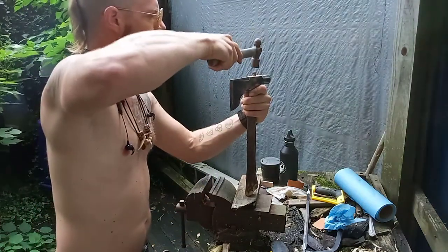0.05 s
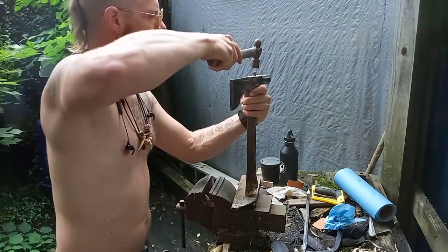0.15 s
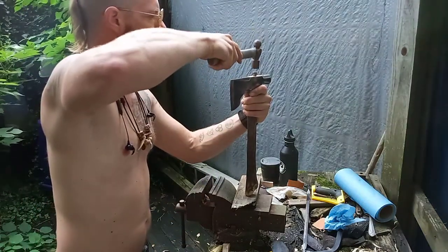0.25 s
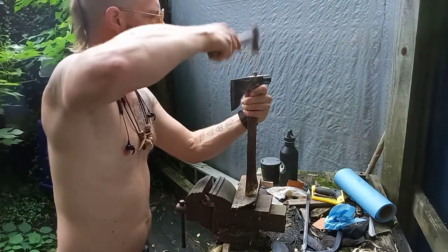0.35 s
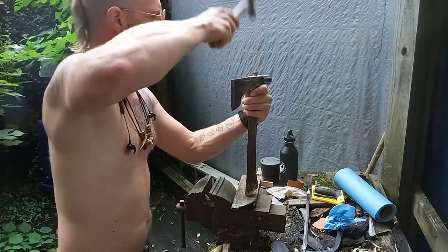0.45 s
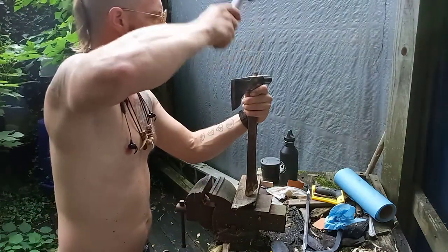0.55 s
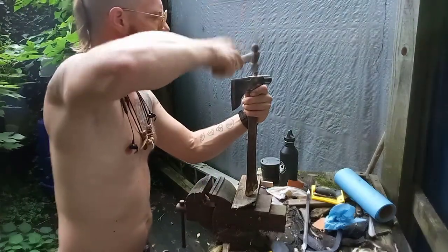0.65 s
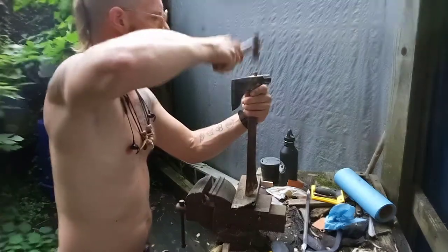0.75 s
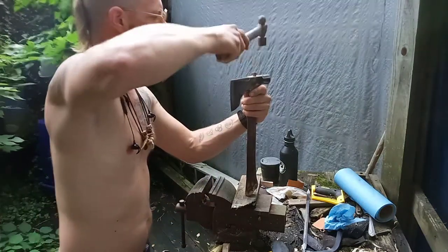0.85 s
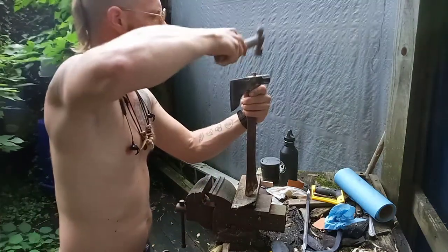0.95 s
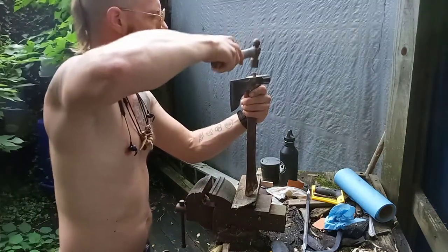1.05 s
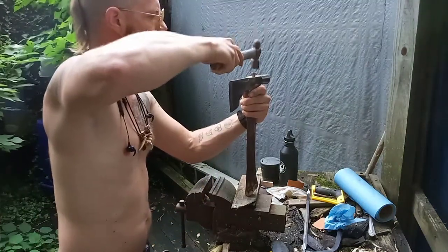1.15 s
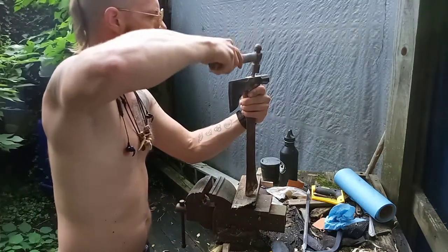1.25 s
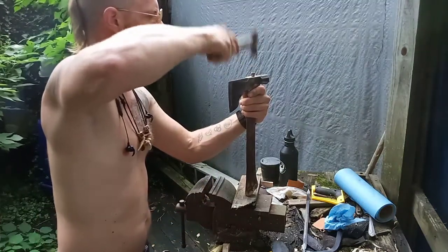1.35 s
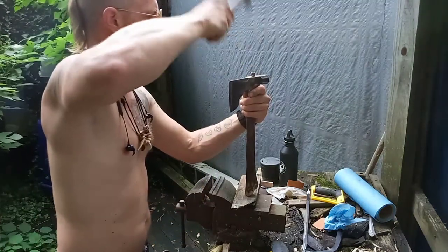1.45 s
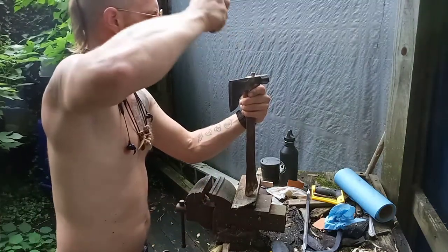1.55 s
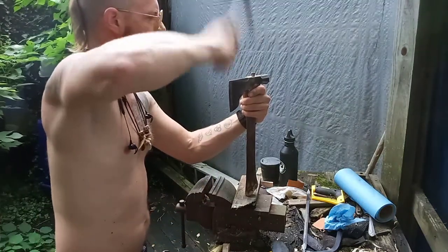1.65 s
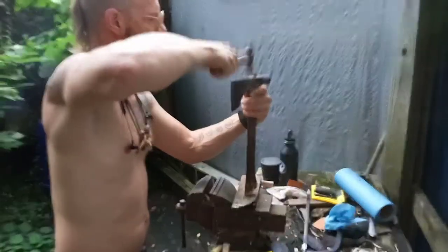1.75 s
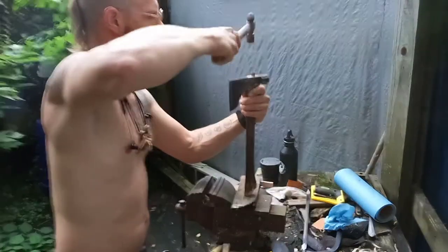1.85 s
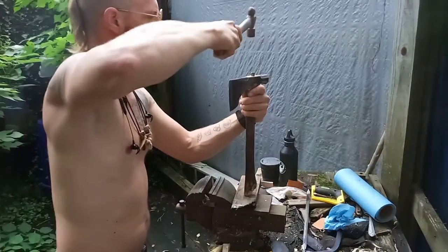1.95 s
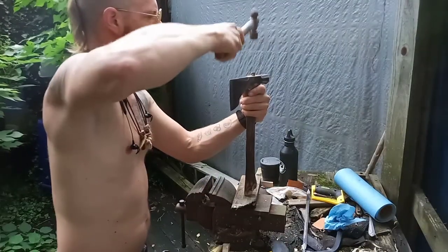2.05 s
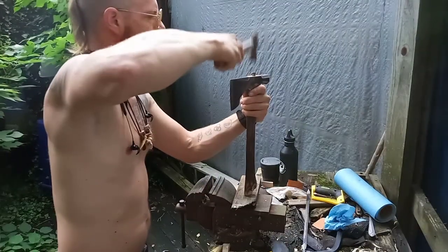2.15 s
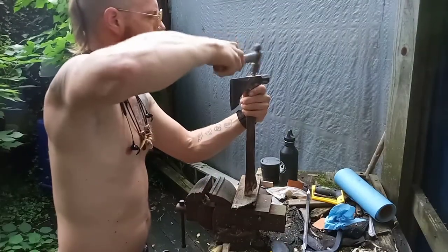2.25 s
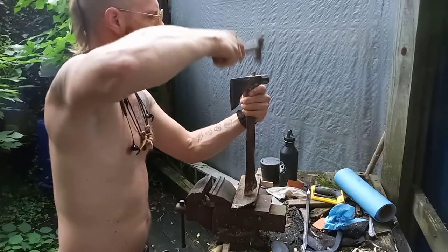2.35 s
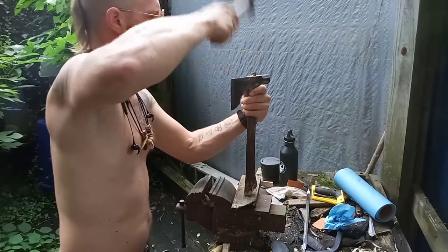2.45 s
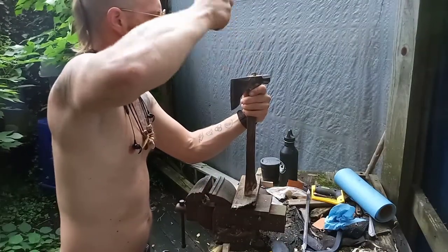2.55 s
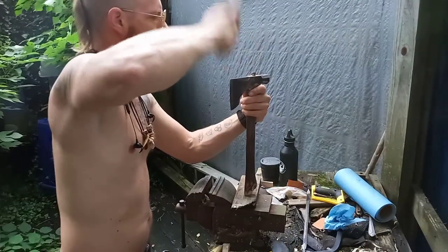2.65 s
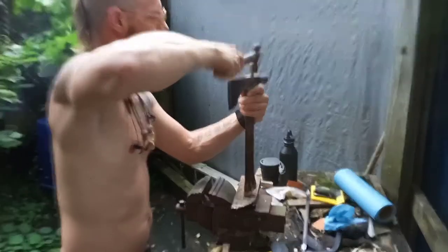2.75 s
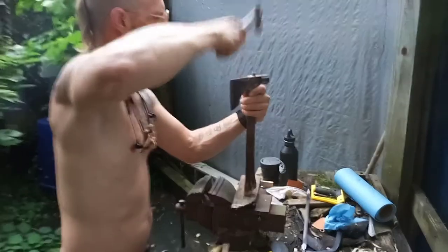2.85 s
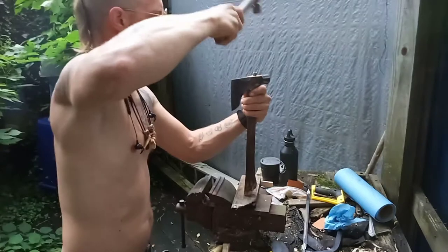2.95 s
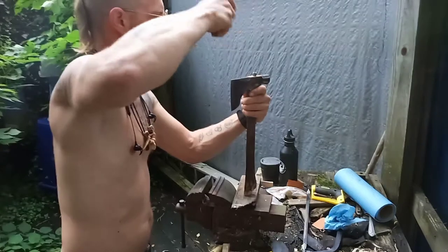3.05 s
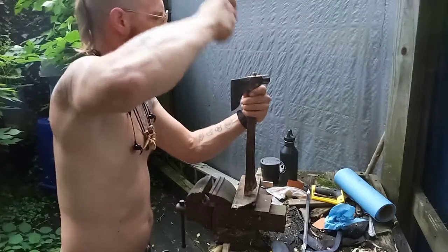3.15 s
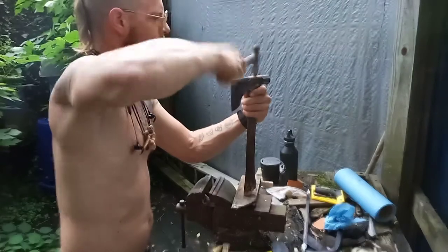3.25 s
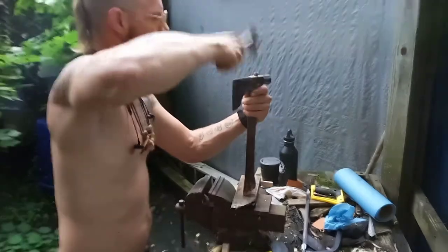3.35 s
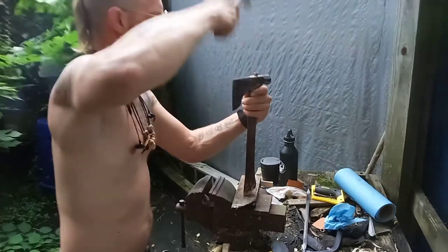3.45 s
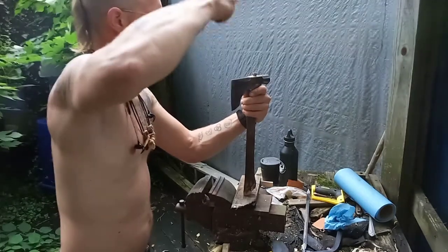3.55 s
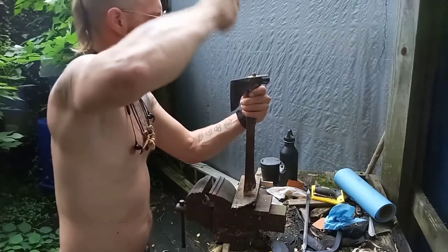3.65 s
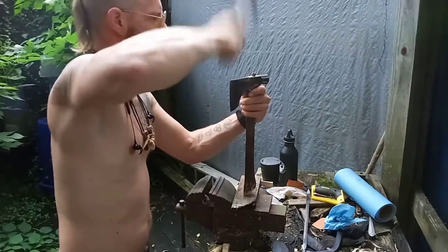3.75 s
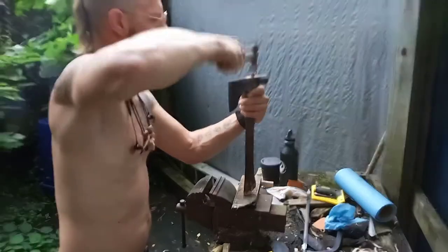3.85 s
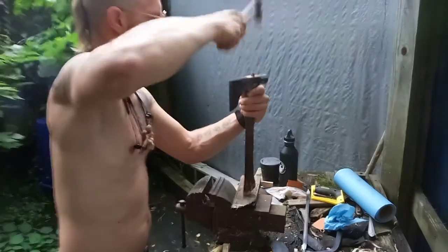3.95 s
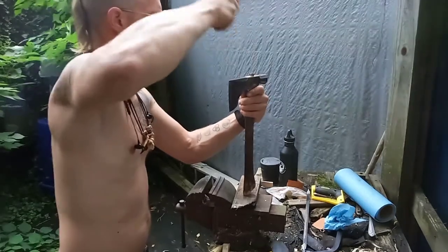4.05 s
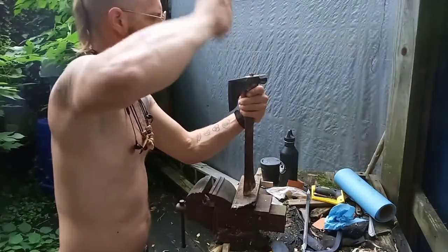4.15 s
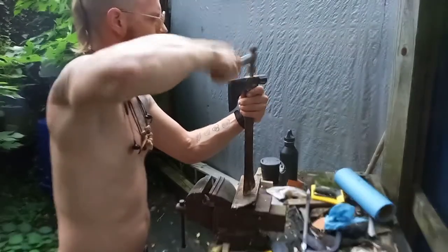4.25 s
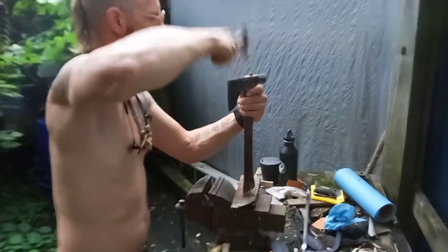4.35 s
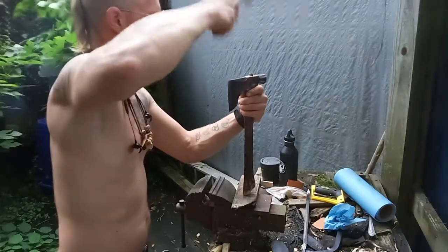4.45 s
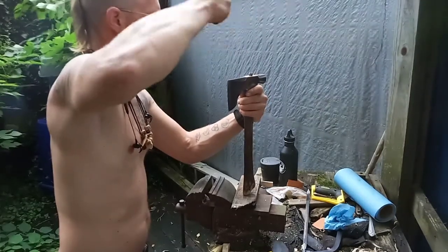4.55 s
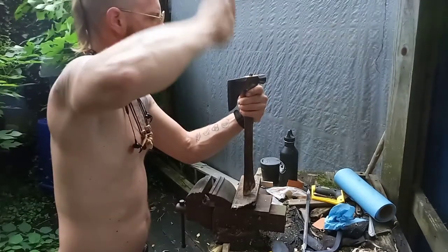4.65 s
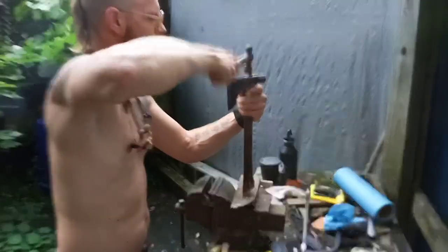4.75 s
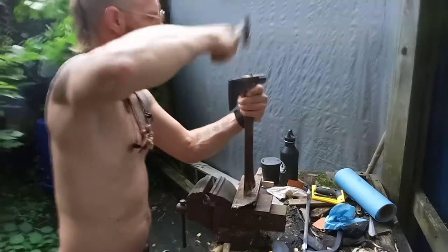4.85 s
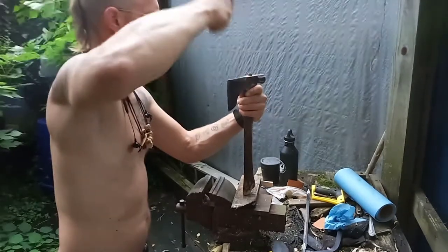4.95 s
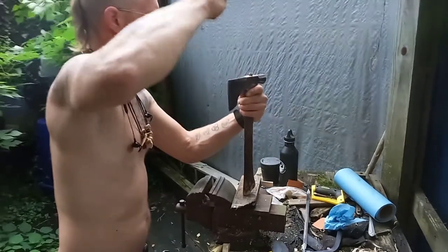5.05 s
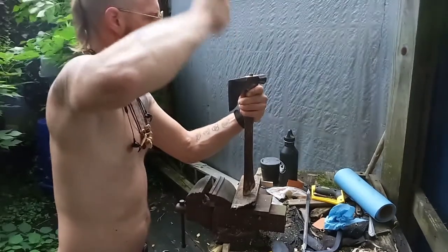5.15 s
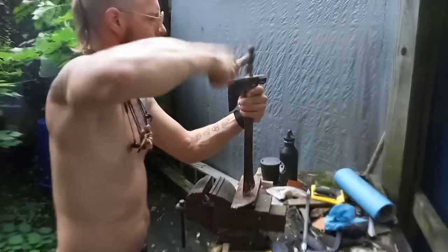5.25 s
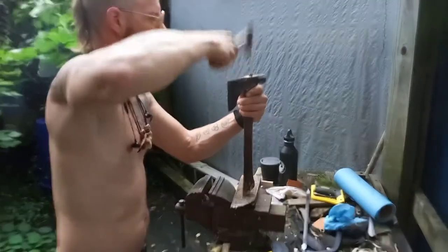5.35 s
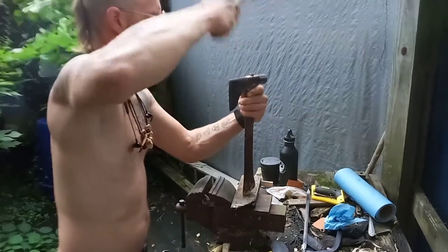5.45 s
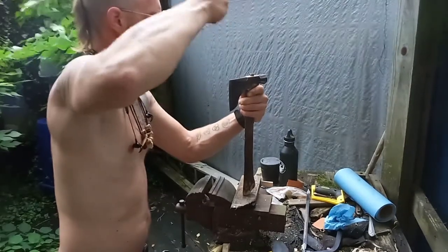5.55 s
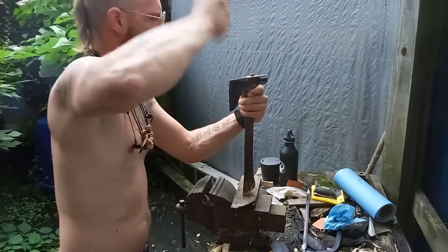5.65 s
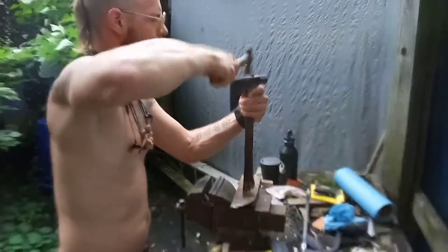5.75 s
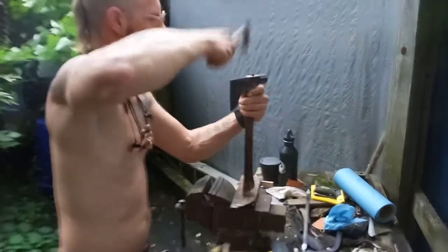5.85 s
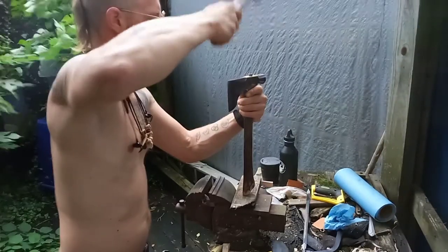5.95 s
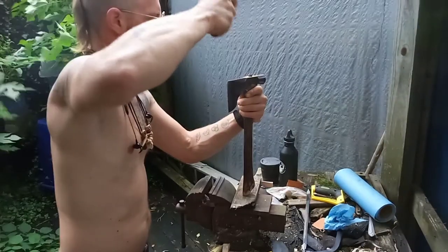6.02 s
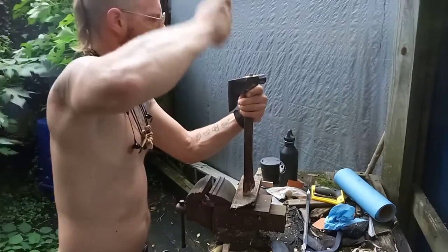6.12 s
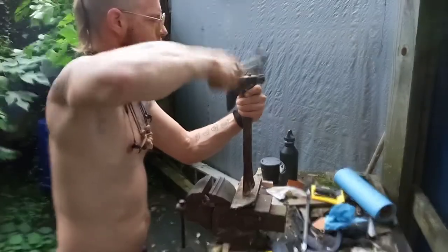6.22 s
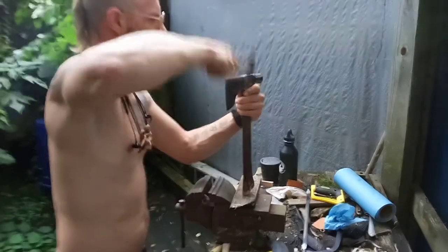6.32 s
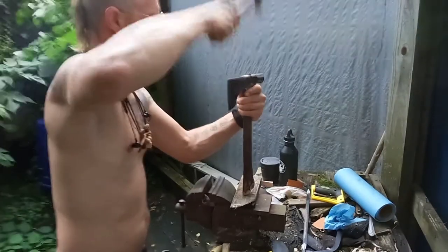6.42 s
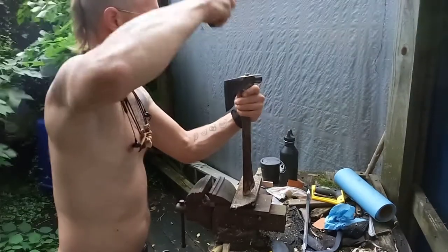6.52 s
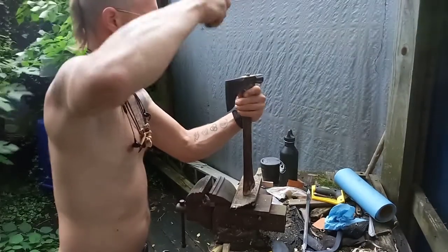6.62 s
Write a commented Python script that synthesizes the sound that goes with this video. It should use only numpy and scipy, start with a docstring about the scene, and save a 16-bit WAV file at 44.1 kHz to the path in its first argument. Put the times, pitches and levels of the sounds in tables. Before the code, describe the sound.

Outdoors in a small yard, a little hammer strikes a wedge in an axe head. A few weak clinks come first, then firm, bright cracks about every half second, each with short steel ringing and a dull wooden thump. Close microphone, quick wall slap, soft leaf hiss, low rumble and faint bird whistles behind.

```python
"""A small hammer drives a wedge into the head of an axe whose handle stands in a vise, in a back yard.
From the start leaf hiss (shaped noise), an uneven rumble and two-note calls of a bird (sliding sines) lie behind.
Lighter blows come first, then firm ones: noise cracks, damped modes ring the steel and thump the handle, light
taps and rebounds only clink, and walls answer. A distant drone (wavering sines) swells twice early on;
later dull bumps (swells of low noise) join the growing rumble and end in a flurry."""
import sys
import numpy as np
from scipy import signal
from scipy.fft import rfft, irfft, next_fast_len
from scipy.io import wavfile
from scipy.ndimage import uniform_filter1d, minimum_filter1d, map_coordinates

SR = 44100
rng = np.random.default_rng(int(sys.argv[2]) if len(sys.argv) > 2 else 0)


def dump_mix(stems):
    """Bounce the given channels to the path in sys.argv[1] as a 16-bit WAV at rate SR."""
    frames = np.atleast_2d(stems).T  # one column per channel
    limited = np.clip(frames, -1, 1)  # hard clip at full scale
    pcm = np.round(limited * 32767).astype(np.int16)
    wavfile.write(sys.argv[1], SR, pcm)


N = 294588


def amp(db):
    """Decibels to gain."""
    return 10 ** (np.asarray(db) / 20)


def unit(x):
    """Scale x to rms 1."""
    return x / np.sqrt(np.mean(x ** 2) + 1e-20)


def along(points, hz):
    """Read (frequency, value) points on a log frequency axis."""
    f, v = np.transpose(points)
    return np.interp(np.log(hz + 1), np.log(f + 1), v)


def wobble(rate):
    """A smooth random curve with rate knots a second."""
    knots = rng.standard_normal(int(N * rate / SR) + 4)
    return map_coordinates(knots, [np.arange(N) * rate / SR])


def filtered(x, response):
    """Multiply the spectrum of x by a response of frequency."""
    n = x.shape[-1]
    padded = next_fast_len(n + SR // 8)
    hz = np.fft.rfftfreq(padded, 1 / SR)
    return irfft(rfft(x, padded) * response(hz), padded)[..., :n]


def noise(spectrum, size):
    """Noise coloured by a spectrum, at rms 1."""
    return unit(filtered(rng.standard_normal(size), lambda hz: amp(along(spectrum, hz))))


def add(track, s, sound):
    """Mix a sound into the track at time s."""
    part = track[max(round(s * SR), 0):][:len(sound)]
    part += sound[:len(part)]


def fade(t, t60, rise):
    """An envelope that starts at t = 0, swells and dies away."""
    t = np.maximum(t, 0)
    decay = np.exp(-np.log(1000) * t / t60)
    return decay * (1 - np.exp(-t / rise))


def ring(modes, t, rise):
    """Damped sine modes; each blow lands elsewhere and shares its energy anew."""
    scatter_db = 2.5
    gains = amp([db for _, db, _ in modes] + scatter_db * rng.standard_normal(len(modes)))
    gains = gains / np.linalg.norm(gains)
    total = np.zeros(len(t))
    for gain, (hz, _, t60) in zip(gains, modes):
        tone = np.sin(2 * np.pi * (hz * t + rng.random()))  # random phase
        total += gain * tone * fade(t, t60, rise)
    return total


def yard(x, wet_db, wall_db, wall_s):
    """Scatter from clutter, a noise tail dying at its own rate in each band, and a slap off the near wall."""
    # reverberation time of the yard: (frequency [Hz], t60 [s])
    tail_t60 = [(150, 0.41), (600, 0.3541), (2500, 0.3456), (7000, 0.42), (10000, 0.4), (15000, 0.43)]
    # colour of the whole answer: (frequency [Hz], level [dB])
    colour = [(150, 0.3), (500, 2), (1200, -3), (2500, -1.3), (5000, -2.5), (7000, -2.5), (15000, -4.5)]
    hz, frames, bands = signal.stft(rng.standard_normal(SR // 2), SR, nperseg=256)
    decay = np.exp(-np.log(1000) * frames / along(tail_t60, hz)[:, None])
    tail = signal.istft(bands * decay, SR, nperseg=256)[1]
    t = np.arange(len(tail)) / SR
    tail = tail * np.clip((t - .004) / 0.0057, 0, 1)  # a short gap before the scatter
    slap = rng.standard_normal(len(t)) * fade(t - wall_s, t60=0.039, rise=0.0014)
    answer = amp(wet_db) * tail / np.linalg.norm(tail)
    answer += amp(wall_db) * slap / np.linalg.norm(slap)
    coloured = filtered(answer, lambda f: amp(along(colour, f)))
    return signal.fftconvolve(x, coloured)[:len(x)]


def hammering():
    """The face scrapes onto the wedge, cracks against it and sets steel and handle ringing."""
    # hammer contacts, levels relative within each part: (time [s], crack level [dB], handle thump level [dB],
    # wedge ring level [dB], hammer head ring level [dB], axe cheek ring level [dB], axe blade ring level [dB])
    blows = [(0.627, -32, -31.5, -65, -41, -54, -68), (1.1762, -42, -56, -48.5, -52, -51.5, -71),
             (1.671, -28, -30, -33.5, -37, -34, -72), (1.7199, -29.5, -47, -34, -66, -47, -66),
             (2.1997, -34.5, -49.5, -60, -45, -37.5, -76), (2.6745, -21, -27, -30, -22, -22.5, -76),
             (3.2255, -21, -29.5, -27.5, -45, -29.5, -49.5), (3.7338, -22, -25.5, -27, -31, -28, -54.5),
             (4.2337, -24, -29, -30.5, -22.5, -39, -44.5), (4.7213, -23, -27.5, -30, -26.5, -33, -50.5),
             (5.2141, -19, -24, -23.5, -33, -31, -56), (5.7131, -24.5, -27, -32.5, -37, -42, -53),
             (5.741, -21, -59, -25.5, -36, -29.5, -56), (6.192, -21, -27, -27, -21, -23.5, -52.5),
             (6.3084, -27, -50, -42, -27.5, -26.5, -64)]
    # modes of the struck parts and a thin steel overtone: (frequency [Hz], relative level [dB], t60 [s])
    hammer_modes = [(6524, 8, 0.017), (6965, 6, 0.024), (7155, 5.5, 0.081), (13935, -21, .07)]
    wedge_modes = [(5380, 11.5, 0.045), (5340, -12, 0.19), (11200, -17, 0.1)]
    blade_modes = [(4277, 5, 0.29), (5368, -8, 0.45)]
    handle_modes = [(109.8, -10.5, 0.14), (160.7, 0.5, 0.12), (219.5, -4, 0.068), (262.7, -7, 0.062),
                    (335, -3.5, 0.073), (395, -8, 0.067), (523, -23, 0.12), (680, -12, 0.062),
                    (896, -21.5, 0.11)]
    eye_modes = [(1548, -5.5, 0.14), (1612, 0.5, 0.048), (1760, -9, 0.085)]
    cheek_modes = [(2194, 1, 0.023), (2490, -10, 0.083), (2400, 7, 0.055), (3430, -24.5, 0.085),
                   (4900, -4, 0.039)]
    overtone_mode = [(8686, 0, .24)]
    # spectra of crack, its top, wood crunch and loose rattle: (frequency [Hz], relative level [dB per Hz])
    crack_spectrum = [(60, -18), (250, -4), (700, -5.5), (1350, -10), (2100, 2.5), (2600, 2.5),
                      (3000, -7.5), (3700, 1.5), (4300, -3.5), (4800, 0), (5800, 1), (7000, 7.5),
                      (7900, -7), (10000, -33)]
    sizzle_spectrum = [(5000, -37), (8000, -2.5), (10800, 2.5), (12500, 6.5), (13400, -10), (15400, 9),
                       (16000, -29), (17000, 1)]
    wood_spectrum = [(60, -17), (200, -0.5), (480, -2), (750, -0.5), (1300, -3.5), (1900, -6), (3500, -9.5),
                     (8000, -39)]
    rattle_spectrum = [(100, -15), (400, -7), (700, 6.5), (950, -2), (1500, -15), (4000, -67)]
    # spread of the highest treble between the channels: (frequency [Hz], side level [dB])
    width = [(2500, -73), (4400, -50), (7000, -40), (9000, -11), (15000, -10)]
    blade_hold_s = 0.17  # the blade sings this long, then dies quickly
    lead_s = .006  # room for the scrape ahead of the contact
    track = np.zeros(N)
    t = np.arange(SR * 3 // 5) / SR - lead_s
    for s, crack_db, thump_db, wedge_db, hammer_db, cheek_db, blade_db in blows:
        # the firmer the blow (thump over crack), the brighter its crack
        bright_db = 6.5 + 0.7 * (thump_db - crack_db)
        # the overtone is driven partly by the crack, partly by the hammer's ring
        overtone_db = crack_db - 16.5 + 0.52 * (hammer_db - crack_db)

        scrape = amp(-15) * fade(t + 0.0028, t60=0.03, rise=0.00077) * (t < 0)  # the face's first touch
        contact = scrape + fade(t, t60=0.023, rise=0.00048)
        snap = scrape + fade(t, t60=0.023, rise=0.00021)  # the top rises faster
        crack = amp(crack_db + 9.5) * contact * noise(crack_spectrum, len(t))
        crack += amp(crack_db + bright_db) * snap * noise(sizzle_spectrum, len(t))

        # the axe's eye follows the thump, so it rings more under a firm blow
        steel = amp(thump_db - 0.5) * ring(eye_modes, t, rise=0.0026)
        steel += amp(cheek_db + 11) * ring(cheek_modes, t, rise=0.0016)
        steel += amp(wedge_db + 13.0) * ring(wedge_modes, t, rise=0.0005)
        steel += amp(hammer_db + 14.0) * ring(hammer_modes, t, rise=0.00011)

        # the blade takes up its ring slowly
        blade = amp(blade_db + 20) * ring(blade_modes, t, rise=0.056)
        singing = blade / (1 + (np.abs(t) / blade_hold_s) ** 6)
        singing += amp(overtone_db) * ring(overtone_mode, t, rise=0.0018)

        # a firm blow sinks the wedge: the wood crunches and the handle bounces in the vise
        wood = amp(thump_db + 10.5) * ring(handle_modes, t - .001, rise=0.0032)
        crunch = noise(wood_spectrum, len(t)) * fade(t, t60=0.062, rise=0.00052)
        wood += amp(thump_db + 1.5) * crunch
        # something loose on the bench is jolted up and lands again
        rattle = noise(rattle_spectrum, len(t)) * fade(t - .086, t60=0.05, rise=0.002)
        wood += amp(thump_db - 12) * rattle

        # the steel's ring reaches the yard weaker than the crack does
        sent = crack + wood + amp(-5.5) * steel
        answer = yard(sent, wet_db=-10.0, wall_db=-15.5, wall_s=0.02545)
        add(track, s - lead_s, crack + steel + singing + wood + answer)
    # a quarter-cycle shift makes the side signal, opposite in the two channels
    side = filtered(track, lambda hz: 1j * amp(along(width, hz)))
    return np.array([track + side, track - side])


def bird():
    """Pairs of faint, quavering whistles that hang, then slide down, blurred by distance."""
    # two-note calls: (time [s], gap to the second note [s], level [dB])
    calls = [(0.69, 0.12, -58.5), (1.834, 0.135, -59.5), (2.893, 0.12, -56), (4.16, 0.244, -57),
             (5.44, 0.11, -57)]
    track = np.zeros(N)
    note_s, fall = 0.06, 0.37  # length, share of the pitch lost
    u = np.linspace(0, 1, int(note_s * SR))
    swell = np.abs(np.sin(np.pi * u)) ** 0.63
    for s, gap, db in calls:
        # the second note is lower and softer
        for start, hz, note_db in [(s, 5700, db), (s + gap, 5300, db - 2.5)]:
            quaver = np.interp(u, np.linspace(0, 1, 24), rng.standard_normal(24))
            pitch = hz * (1 - fall * u ** 1.4 + 0.018 * quaver)
            whistle = np.sin(2 * np.pi * np.cumsum(pitch) / SR)
            add(track, start, amp(note_db) * swell * whistle)
    return track + yard(track, wet_db=-1, wall_db=-10, wall_s=0.015)


def bumps():
    """Soft, dull swells of low noise: single ones first, then an uneven flurry."""
    # single bumps, level before a common trim: (time [s], level [dB], length [s])
    singles = [(4.689, -44, 0.019), (5.002, -47, 0.081), (5.149, -43, 0.046), (5.896, -43.5, 0.019),
               (6.146, -39.5, 0.034)]
    # relative spectrum: (frequency [Hz], level [dB per Hz])
    dull = [(25, -30), (60, 2), (90, 9.5), (220, 3.5), (380, -6), (600, -30), (1500, -48), (4000, -90)]
    track = np.zeros(N)
    flurry_s, spacing_s = 6.35, 0.083
    flurry = []
    for k, (shift, loud) in enumerate(rng.standard_normal(size=(4, 2))):
        flurry.append((flurry_s + spacing_s * (k + 0.12 * shift), -46.5 + 1.5 * loud, 0.04))
    for s, db, length in [*singles, *flurry]:
        swell = np.hanning(int(2 * length * SR))  # peaks at time s
        add(track, s - length, amp(db - 2) * unit(swell * noise(dull, len(swell))))
    return track


def drone():
    """A distant hum, a sine of wavering pitch and level, that swells, holds and fades."""
    # swells: (start [s], length [s], mean frequency [Hz], mean level [dB])
    swells = [(0.4, 1.9, 99.6, -60), (3.137, 1.125, 135.2, -51)]
    track = np.zeros(N)
    fade_s = 0.13
    for s, length, hz, db in swells:
        t = np.arange(N) / SR - s
        swell = np.clip(np.minimum(t, length - t) / fade_s, 0, 1)
        level = amp(db + 2.2 * wobble(3.9))
        pitch = hz + 3.36 * wobble(19)
        track += swell * level * np.sin(2 * np.pi * np.cumsum(pitch) / SR)
    return track


def outdoors():
    """Steady leaf hiss and an uneven rumble that grows towards the end, both of shaped noise."""
    # course of the rumble, before a common trim: (time [s], level [dB])
    rumble_course = [(0.0, -54), (0.39, -58.5), (3.16, -54.5), (3.85, -58), (4.33, -55.5), (6.68, -49)]
    # relative spectra of hiss and rumble: (frequency [Hz], level [dB per Hz])
    hiss_spectrum = [(150, -14), (310, 2.5), (500, -2), (1000, -8), (2000, -11.5), (3200, -13),
                     (4800, -12.5), (6000, -9.5), (7000, -8), (8000, -26.5), (11000, -23), (13500, -31),
                     (15500, -26)]
    rumble_spectrum = [(13, -61), (22, -27), (32, -59), (48, -7.5), (87, 3.5), (135, 2.5), (157, -5),
                       (222, -0.5), (360, -21.5), (600, -22), (780, -33), (1320, -120)]
    times, levels = np.transpose(rumble_course)
    rumble_db = np.interp(np.arange(N) / SR, times, levels) - 1
    hiss = amp(-60 + 1.2 * wobble(4.01)) * noise(hiss_spectrum, N)
    rumble = amp(rumble_db + 1.5 * wobble(13)) * noise(rumble_spectrum, N)
    return hiss + rumble


def limited(x, threshold_db, slope, ahead_s, hold_s, release_s):
    """A look-ahead limiter: the gain sinks just before a peak, holds, then recovers."""
    peak_db = 20 * np.log10(np.abs(x).max(axis=0) + 1e-9)  # the louder channel steers both
    over = np.maximum(peak_db - threshold_db, 0)
    ahead, hold = int(ahead_s * SR), int(hold_s * SR)
    # widen each peak to cover look-ahead and hold
    cut = np.roll(-minimum_filter1d(-over, ahead + hold), (hold - ahead) // 2)
    # let the cut die away exponentially
    age = np.arange(N) / (release_s * SR)
    cut = np.exp(np.maximum.accumulate(np.log(cut + 1e-9) + age) - age)
    return x * amp(-slope * uniform_filter1d(cut, ahead))


def scene():
    """The blows over the yard's background."""
    return hammering() + bird() + bumps() + drone() + outdoors()


def record(dry):
    """A limiter ducks loud peaks, then a steep low-pass removes the highest treble."""
    ducked = limited(dry, threshold_db=-18.5, slope=0.46, ahead_s=0.0093, hold_s=0.0061, release_s=0.011)
    return filtered(ducked, lambda hz: hz < 16300)


dry = scene()
out = record(dry)
dump_mix(out)
```